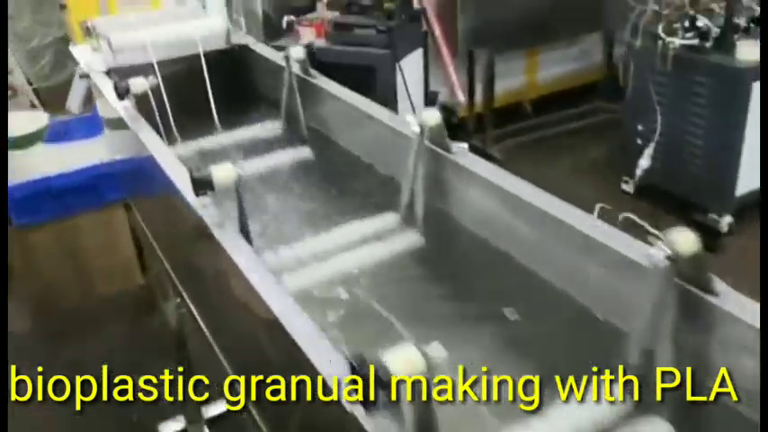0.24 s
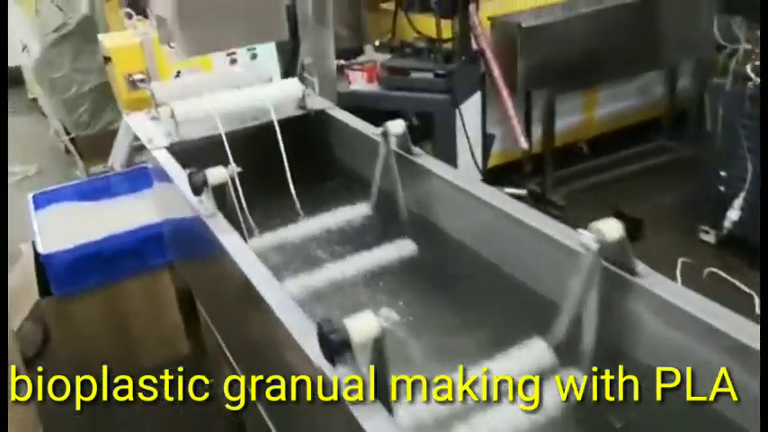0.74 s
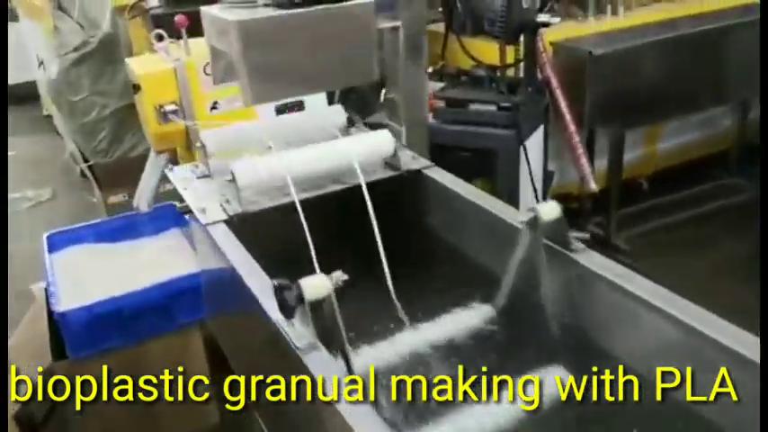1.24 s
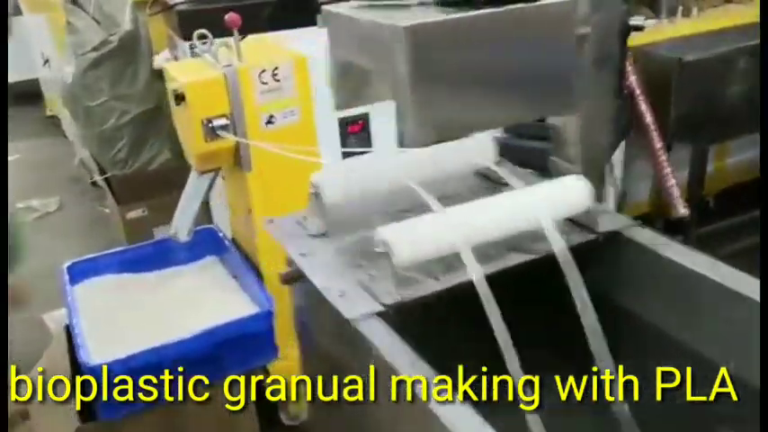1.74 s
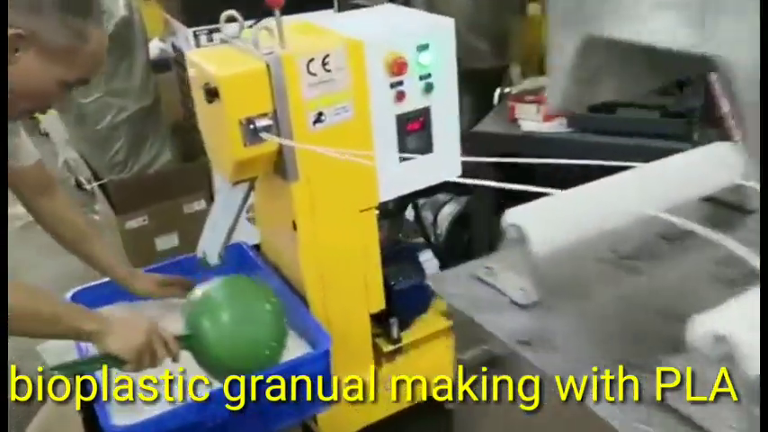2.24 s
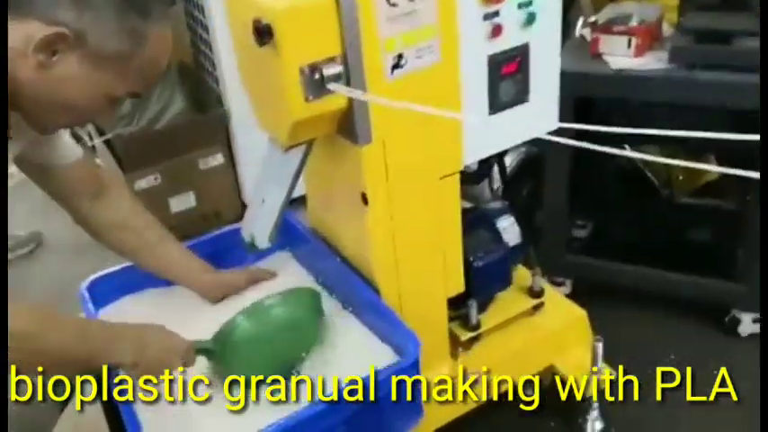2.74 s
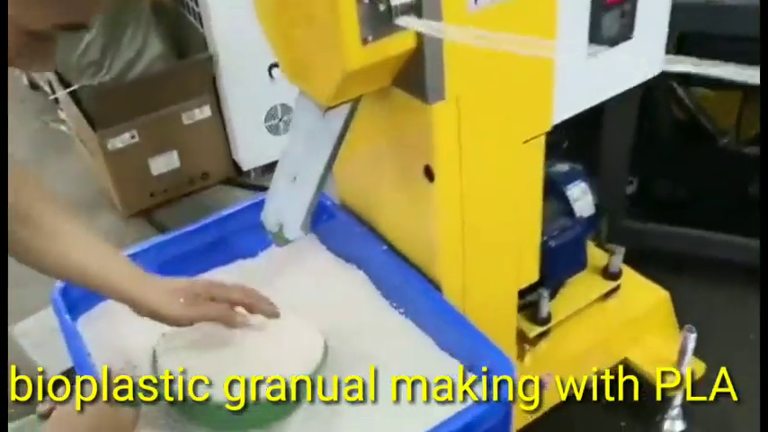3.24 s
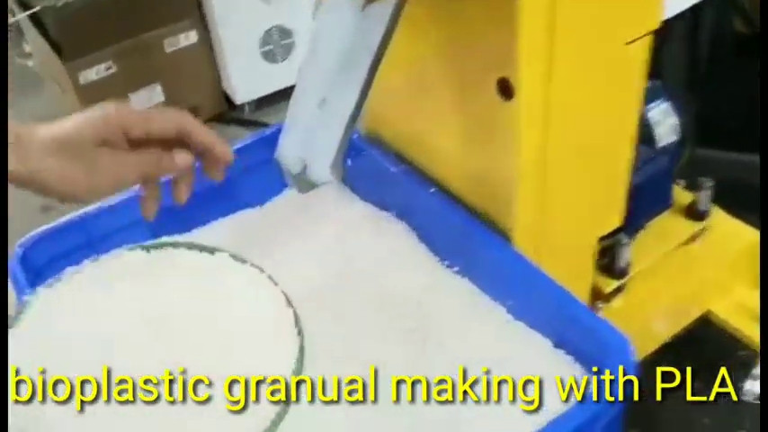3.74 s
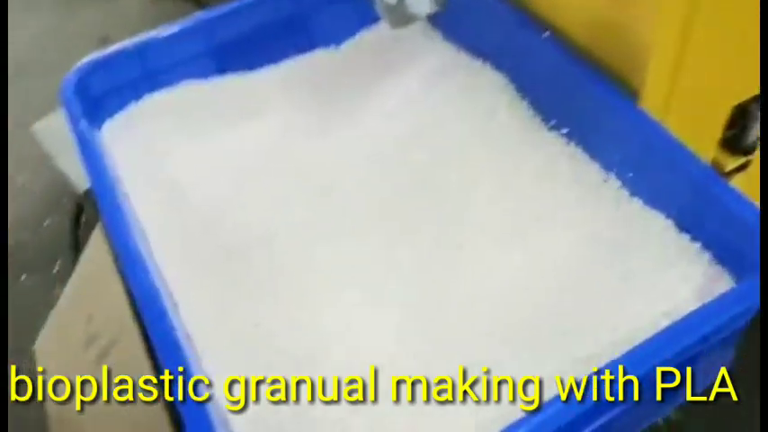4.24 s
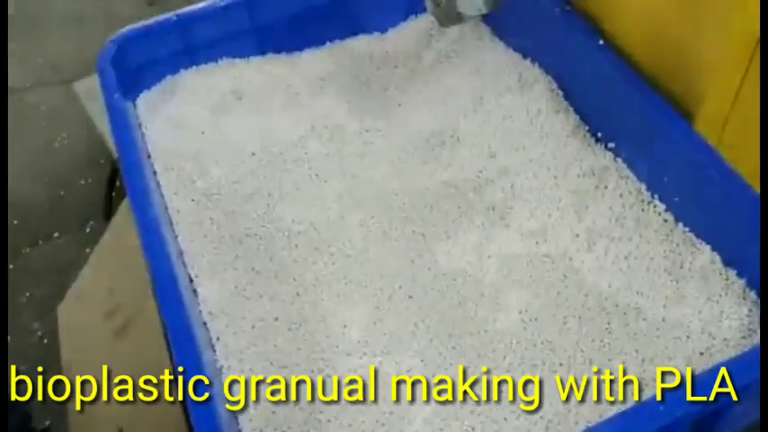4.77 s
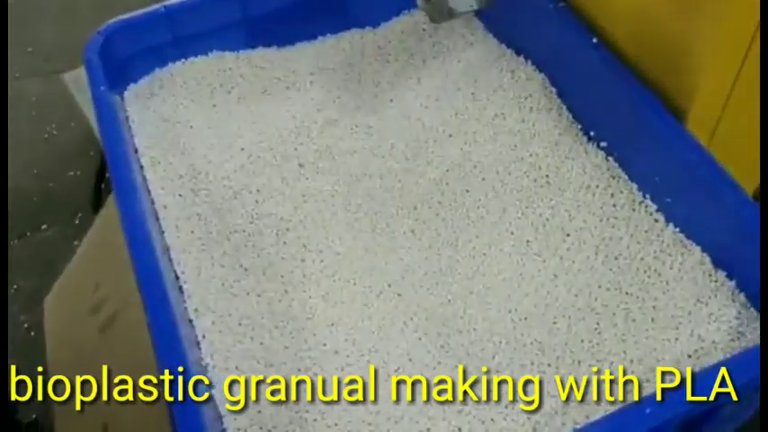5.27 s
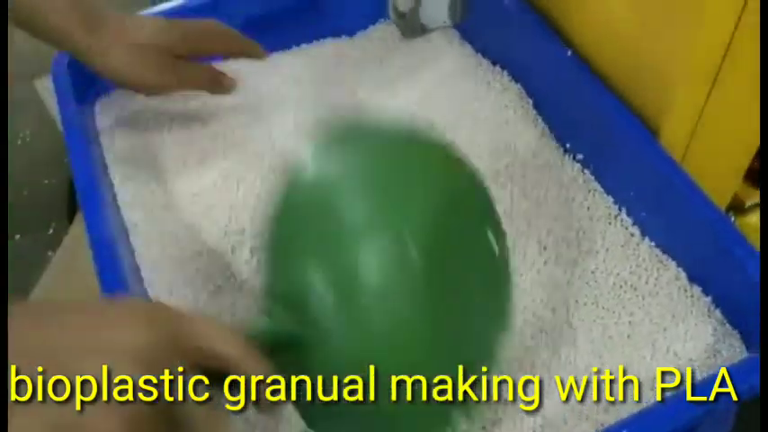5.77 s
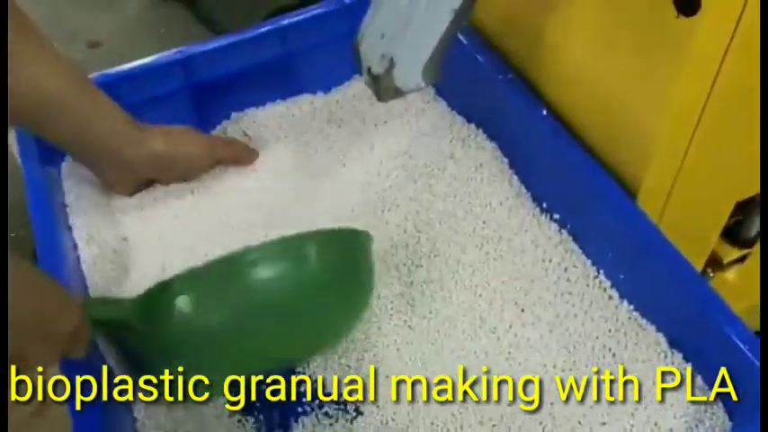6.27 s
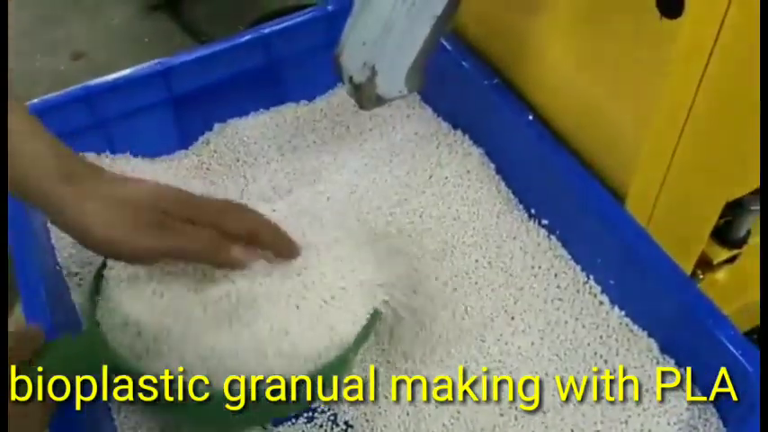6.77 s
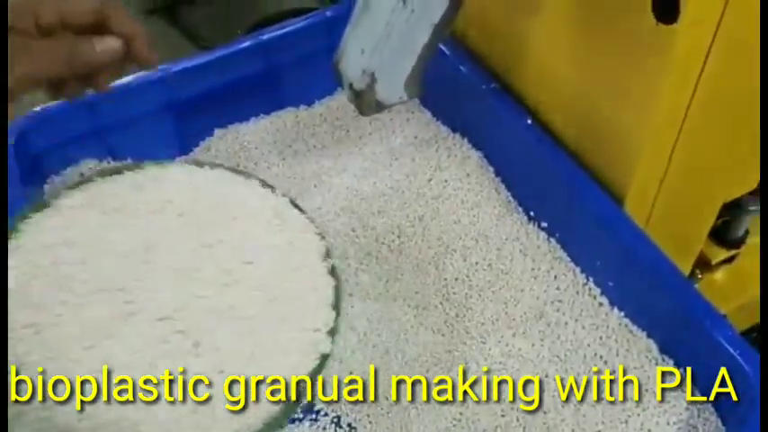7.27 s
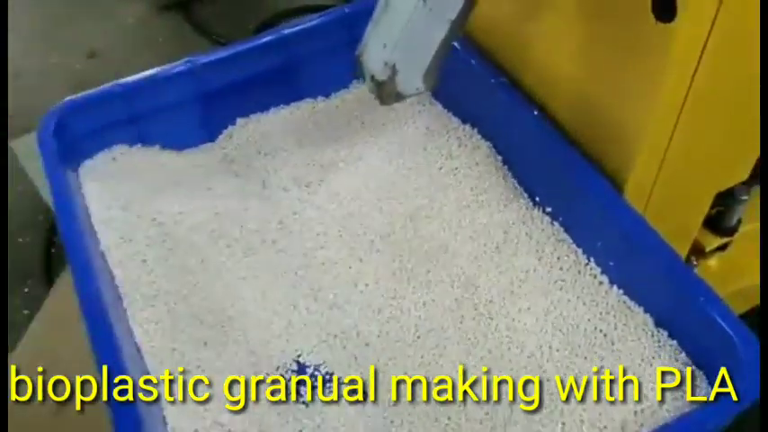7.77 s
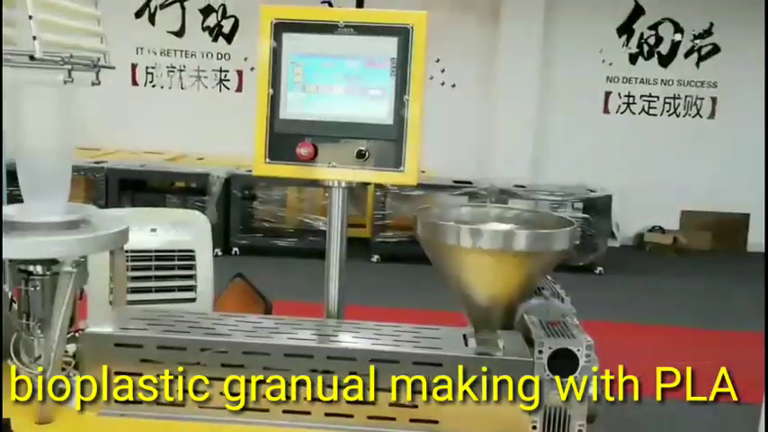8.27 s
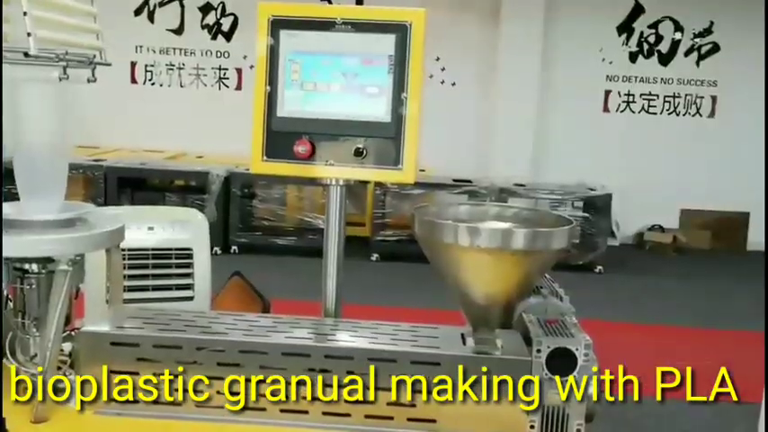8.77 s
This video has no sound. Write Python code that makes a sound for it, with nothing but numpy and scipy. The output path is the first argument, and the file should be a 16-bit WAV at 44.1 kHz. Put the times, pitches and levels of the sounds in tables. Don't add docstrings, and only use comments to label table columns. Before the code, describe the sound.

In a hard factory hall, a handheld phone approaches a strand pelletizer. Broad fan and pump roar carries a rough, metallic whine near one kilohertz that swells and shifts sides. Pellet rattle grows closer, with tiny squeaks, dull knocks and a sharp scoop rap. At about eight seconds it cuts to silence, then a quieter extruder rumbles with a thin high whistle.

```python
import sys
import numpy as np
from scipy import signal
from scipy.io import wavfile
from scipy.ndimage import uniform_filter1d, map_coordinates

SR = 44100
rng = np.random.default_rng(int(sys.argv[2]) if len(sys.argv) > 2 else 0)


def to_wav(sig):
    pcm = np.clip(np.atleast_2d(sig), -1, 1) * 32767
    pcm = np.round(pcm).astype(np.int16)
    wavfile.write(sys.argv[1], SR, pcm.T)


def natural_amplitude(level_db):
    exponent = np.asarray(level_db, float) / 20
    return 10 ** exponent


N = 397341
TIME = np.arange(N) / SR
HOP = 512
FREQ = np.arange(2 * HOP + 1) * SR / (4 * HOP)
FRAME_S = np.arange(-(-N // HOP) + 1) * HOP / SR
ROTOR_HZ, KNIVES = 14.977, 14
CUT_S, RESUME_S = 8.0905, 8.4285

# (time [s], distance to the cutter [m], distance to the chute mouth [m])
WALK = [(0, 6.4, 6.5), (1.0, 1.55, 4.9), (2.0, 2.3, 3.1), (2.5, 1.46, 1.6), (3.0, 1.1, 1.93),
        (3.65, 1.09, 1.46), (4.5, 1.17, 1.24), (5.3, 1.11, 1.08), (6.7, 1.06, 0.93), (8.1, 1.01, 1.17)]
# (time [s], main tone turned to the left port [dB])
TURN = [(0, 6.5), (.55, 3), (.9, 9.5), (1.5, -11), (1.8, 0), (2.1, 9.5), (2.8, 4.5), (3.7, 7.5),
        (4.55, -12.5), (5.3, -1), (7.0, 0.5), (7.7, -5), (8.1, -2.5)]


def columns(table, t):
    s, *values = np.transpose(table)
    return np.array([np.interp(t, s, v) for v in values])


def over_hz(hz, points_hz, values):
    place = np.interp(np.log(np.maximum(hz, 1)), np.log(points_hz), np.arange(len(points_hz)))
    low = np.minimum(place.astype(int), len(points_hz) - 2)
    share = (place - low).reshape((-1,) + (1,) * (np.ndim(values) - 1))
    return np.asarray(values)[low] * (1 - share) + np.asarray(values)[low + 1] * share


def drift(rate, count=1):
    knots = rng.standard_normal((count, 400))
    place = np.minimum(FRAME_S * rate, 399)
    return np.array([map_coordinates(k, [place], order=3) for k in knots])


def patches(rate, band_hz):
    place = np.meshgrid(np.minimum(FREQ / band_hz, 399), FRAME_S * rate, indexing="ij")
    return map_coordinates(rng.standard_normal((400, 400)), place, order=1)


def bump(t, s, half_s):
    return np.exp(-((t - s) / half_s) ** 4)


def rise(s, edge_s):
    return (1 + np.tanh((FRAME_S - s) / edge_s)) / 2


def spectra_of(x):
    return signal.stft(x, nperseg=4 * HOP, noverlap=3 * HOP)[2]


def sound_of(spectra):
    return signal.istft(spectra, nperseg=4 * HOP, noverlap=3 * HOP)[1][:, :N]


def port_table(hz):
    # (frequency [Hz], likeness [0-1], lead of the right port [rad], left minus right [dB])
    port_rows = [(0, 1, 0, 0), (100, .995, .02, 0), (190, .97, .1, 0), (400, .55, .9, -1),
                 (580, .65, 3.1, -3), (800, .45, 6, -3), (1100, .75, 6.2, -6), (1500, .5, 6.3, -3),
                 (2200, .3, 8.8, -4), (3300, .25, 11.9, -3), (4500, .2, 16.6, -8), (5700, .3, 20.5, -10),
                 (8000, .3, 29.6, -7)]
    return columns(port_rows, hz)


def ports(db, grain, turn_db=0):
    like, lead, pan_db = port_table(FREQ)[:, :, None]
    like = np.clip(like, 0, 1)
    near, other = spectra_of(rng.standard_normal((2, N)) * grain)
    half_db = (pan_db + turn_db) / 2 + (1 - like) * 3.6 * patches(10, 89.8)
    left = near * natural_amplitude(db + half_db)
    mixed = like * np.exp(1j * lead) * near + np.sqrt(1 - like ** 2) * other
    right = mixed * natural_amplitude(db - half_db)
    return sound_of(np.array([left, right]) * np.sqrt(SR / 2))


def nearness(metres, hall_db):
    near_m = 1
    hall = np.minimum(natural_amplitude(2 * hall_db), 1)
    return 10 * np.log10(hall + (1 - hall) * (near_m / metres) ** 2)


def whine_map(hz):
    whine_hz = [684, 826, 1006, 1270, 2000]
    hall_whine_db = [-4.5, -11, -16, -7.5, -8]
    # (time [s], half length [s], level [dB])
    crests_3rd = [(.3, .35, 5), (1.2, .35, 4), (2.4, .55, 12), (3.3, .15, -4), (4.3, .85, 5.5),
                  (5.65, .12, -9), (6.55, .25, -8), (7.12, .13, 5)]
    crests_4th = [(.05, 0.14, -17), (.9, 0.49, 5), (1.7, 0.18, -4), (2.1, 0.25, 5.5), (2.8, 0.41, -10),
                  (3.2, 0.07, 5)]
    crests_5th = [(.08, .1, -6), (.4, .15, 3), (.9, .22, -8), (1.27, .07, 3), (1.5, .1, -4), (1.95, .1, -4),
                  (3.4, .07, -3.5)]
    crests_6th = [(.2, 0.23, 4), (.8, .28, 6), (1.13, .05, -11), (1.35, 0.13, 7.5), (1.68, .14, -15),
                  (2.12, 0.14, 8.5), (2.45, 0.18, -7), (3.05, .35, 4.5)]
    crests_7th = [(1.4, .3, 3), (3.0, 0.18, 2), (5.1, .25, 4), (5.8, 0.13, 4), (7.0, .3, 4)]
    crests_9th = [(1.85, 0.25, 3), (2.55, .25, 2), (3.42, 0.1, 8.5), (4.2, .4, -5), (5.9, 0.35, 3.5),
                  (7.0, .15, 3), (7.6, 0.18, 5.5)]
    stroke_crests = {3: crests_3rd, 4: crests_4th, 5: crests_5th, 6: crests_6th, 7: crests_7th, 9: crests_9th}
    crest_width = .013
    cutter_m, chute_m = columns(WALK, FRAME_S)
    levels = [nearness(chute_m if k == 1 else cutter_m, db) for k, db in enumerate(hall_whine_db)]
    levels[2] = levels[2] - 7.5 * (1 - rise(2.36, .05))
    db = over_hz(hz, whine_hz, levels)
    for stroke, rows in stroke_crests.items():
        around = np.exp(-((hz / (stroke * KNIVES * ROTOR_HZ) - 1) / crest_width) ** 2)
        swell_db = sum(crest_db * bump(FRAME_S, s, half_s) for s, half_s, crest_db in rows)
        db = db + np.outer(around, swell_db)
    return db, columns(TURN, FRAME_S)[0]


def roar_levels():
    cutter_m, chute_m = columns(WALK, FRAME_S)
    rumble = 2 * (1 - rise(3.9, .1))
    clatter = nearness(cutter_m, -4.5)
    hiss = nearness(chute_m, -6.5) - 1.5
    rattle = 1.45 * nearness(chute_m, -15)
    turn_db = .5 + 0.13 * columns(TURN, FRAME_S)[0]
    return rumble, clatter, hiss, rattle, turn_db


def extruder():
    # (frequency [Hz], level [dB per Hz])
    extruder_colour = [(25, -58.5), (70, -73), (110, -45), (150, -44.5), (190, -58.5), (430, -59),
                       (520, -71), (760, -69.5), (1150, -68.5), (1600, -73.5), (2300, -65.5), (3000, -73),
                       (3600, -84.5), (7600, -88), (8000, -75.5), (8280, -83), (8400, -94)]
    # (frequency [Hz], level [dB])
    drive = [(7720, -63), (7790, -52.5), (7833, -55.5), (7860, -50), (7973, -44), (8000, -54.5),
             (8027, -44), (8053, -58), (8113, -64), (8140, -50)]
    # (time [s], half length [s], level [dB])
    lulls = [
        (8.475, 0.018, -12),
        (8.629, 0.018, -19.5),
        (8.875, 0.021, -9),
    ]
    bearing = (671.5, -53)  # Hz, dB
    surge_db = 1.5 - 3.5 * (FRAME_S - RESUME_S)
    surge_db = surge_db + sum(db * bump(FRAME_S, s, half_s) for s, half_s, db in lulls)
    surge = np.minimum(surge_db, 9) * ((FREQ > 90) & (FREQ < 190))[:, None]
    room_db = 2.4 * patches(8.2, 150.) * (FREQ > 200)[:, None]
    out = ports(over_hz(FREQ, *np.transpose(extruder_colour))[:, None] + surge + room_db, 0.94)
    start = 8 * SR
    time = TIME[start:]
    for hz, db in [*drive, bearing]:
        lead = 0.91 + 0.63 * np.interp(time, FRAME_S, drift(7.0)[0])
        angle = 2 * np.pi * (hz * time + rng.random()) + np.outer([0, 1], lead)
        out[:, start:] += natural_amplitude(db + np.array([[0.5], [6.5]])) * np.sin(angle)
    return out


def knocks():
    # (time [s], frequency [Hz], level [dB], ring to -60 dB [s])
    thumps = [
        (3.03, 100, -21, .1),
        (3.6, 86, -22, .1),
        (4.13, 70, -22, .1),
        (4.24, 38, -21, .3),
        (4.3, 33, -21, .3),
        (5.6, 62, -19, .2),
        (5.815, 230, -13, 0.06),
        (5.845, 175, -11, .07),
    ]
    out = np.zeros(N)
    for s, hz, db, ring in thumps:
        age = np.maximum(TIME - s, 0)
        decay = np.exp(-np.log(1000) * age / ring)
        onset = np.minimum(age * hz * 2, 1)
        out += natural_amplitude(db) * np.sin(2 * np.pi * hz * age) * decay * onset
    return out


def squeaks():
    # (time [s], length [s], level [dB])
    high_squeaks = [(3.38, .03, -45), (3.53, .04, -41.5), (4.02, .04, -46), (4.128, 0.045, -36.5),
                    (4.238, 0.027, -43.5), (4.376, 0.079, -39), (4.89, .035, -42), (5.505, 0.033, -43),
                    (6.233, 0.026, -25), (6.371, 0.09, -33.5), (6.757, .03, -43), (6.958, .06, -47),
                    (7.454, 0.13, -45.5), (8.003, .05, -43)]
    low_squeaks = [(3.34, 0.027, -41), (3.53, .03, -45), (3.8, .07, -43), (4.0, 0.054, -42),
                   (4.32, .04, -53), (4.55, 0.045, -44), (5.0, .04, -42), (6.42, .07, -41.5),
                   (6.76, .04, -48), (7.33, 0.11, -43)]
    out = np.zeros((2, N))
    for hz, bursts, pan_db in ((7393, high_squeaks, -3), (6156, low_squeaks, -6)):
        size = natural_amplitude(-52) * rise(3.25, .1)
        size = size + sum(natural_amplitude(db) * np.exp(-((FRAME_S - s) / length) ** 2) for s, length, db in bursts)
        waver, flicker = drift(35, count=2)
        angle = 2 * np.pi * np.cumsum(hz + 6 * np.interp(TIME, FRAME_S, waver)) / SR
        size = np.interp(TIME, FRAME_S, size * natural_amplitude(4.5 * flicker))
        balance = natural_amplitude(np.array([[pan_db], [-pan_db]]) / 2)
        out += 1.6 * size * balance * np.sin(angle + np.array([[0], [1.2]]))
    return out


def rotor_turns():
    waver = 0.001193 * drift(3)[0] + 0.001517 * drift(14)[0]
    return np.cumsum(ROTOR_HZ * (1 + np.interp(TIME, FRAME_S, waver)) / SR)


def roar(turns):
    # (frequency [Hz], level [dB per Hz])
    roar_colour = [(25, -68.5), (90, -52.5), (200, -56), (400, -62.5), (560, -62.5), (930, -65.5),
                   (1550, -60.5), (2500, -55), (3200, -58), (3700, -62.5), (4400, -65), (5250, -64),
                   (6300, -65), (7400, -62)]
    # (frequency [Hz], width [Hz], level over the roar [dB])
    housing = [(644, 108, 9.5), (840, 32, 8.5), (1027, 136, 10), (1238, 48, 12), (1270, 80, 8),
               (1428, 40, 4.5), (1710, 200, 5), (1884, 60, 10.5), (2038, 160, 6), (2290, 40, 6.5),
               (2710, 32, 7), (2934, 140, 3.5), (4055, 150, 7), (4656, 110, 6.5), (5080, 100, 1.5),
               (5620, 160, 9.5), (5870, 270, 9), (6600, 320, 3.5)]
    # (time [s], length [s], centre [Hz], width [Hz], level over the roar [dB])
    slides = [
        (1.42, 0.12, 1800, 1600, 3),
        (2.45, .3, 660, 60, 4),
        (4.93, 0.12, 2500, 2600, 6.5),
        (5.15, .12, 1550, 400, 4),
        (5.82, .04, 1800, 2000, 8),
        (6.0, .04, 3500, 3000, 2),
        (6.17, .04, 4200, 1500, 3),
        (7.15, .15, 1550, 400, 4),
        (7.6, .15, 2100, 400, 3),
    ]
    roar_hz = [400, 2600, 4000, 5250, 5480, 5900, 6150]
    rumble, clatter, hiss, rattle, turn_db = roar_levels()
    db = over_hz(FREQ, *np.transpose(roar_colour))[:, None]
    db = db + over_hz(FREQ, roar_hz, [rumble, clatter, hiss, hiss, rattle, rattle, hiss])
    ring = sum((natural_amplitude(2 * d) - 1) / (1 + (2 * (FREQ - hz) / w) ** 2) ** 1.36 for hz, w, d in housing)[:, None]
    drive_db = 0.76 * (whine_map(FREQ)[0] - clatter) * (FREQ < 2200)[:, None]
    db = db + 10 * np.log10(1 + np.maximum(ring, 0) * natural_amplitude(drive_db) ** 2)
    db = db + 2.4 * patches(3.5, 45.) * (FREQ > 550)[:, None]
    db = db + 1.2 * patches(5, 250.) + 2.58 * patches(16, 119.54) + 0.37 * drift(9)
    for s, length, hz, width, slide_db in slides:
        band = np.exp(-((FREQ - hz) / width) ** 2)
        db = db + slide_db * np.outer(band, np.exp(-((FRAME_S - s) / length) ** 2))
    stroke = 1 + .12 * np.cos(2 * np.pi * KNIVES * turns)
    pellets = natural_amplitude(.7 * rng.exponential(size=N // 64 + 1)).repeat(64)[:N]
    grain = stroke * uniform_filter1d(pellets, size=64)
    grain = grain / np.sqrt(np.mean(grain ** 2))
    chute_band = np.exp(-((FREQ - 5400) / 700) ** 2)
    chute_db = -3.5 * np.outer(chute_band, np.minimum(2 * natural_amplitude(rattle), 1))
    return ports(db - 1.5, grain, np.outer(np.clip(FREQ / 2000 - .2, 0, 1), turn_db) + chute_db)


def knives(turns):
    orders = [39.3, 42, 43, 44, 45, 46, 48, 49, 50, 55, 56, 57, 69, 70, 71, 75, 76, 77, 78, 83, 84, 85, 98,
              112, 126, 140, 147, 154, 168, 182, 196, 210, 224]
    left_db = [-54.5, -44.5, -41.5, -34.5, -46, -47, -47, -51, -56, -55.5, -30.5, -51.5, -36, -27.5, -44,
               -39, -33, -39, -31, -43.5, -31, -44, -41, -40, -40.5, -38, -50.5, -36.5, -45, -44, -46.5,
               -43.5, -53.5]
    right_db = [-51, -34, -35.5, -38, -43.5, -38.5, -35, -40.5, -47.5, -45, -37.5, -46, -36, -21, -30.5,
                -33, -29, -28.5, -30.5, -45, -33.5, -37.5, -38, -37, -28, -29.5, -45, -34, -34, -35, -53,
                -48, -49]
    hz = ROTOR_HZ * np.array(orders)
    heard_db, turn_db = whine_map(hz)
    uneven = np.array(orders) % KNIVES > 0
    heard_db = heard_db - 5 * np.outer(uneven, 1 - rise(2.75, .15))
    lead = port_table(hz)[1]
    time, turns = TIME[::4], turns[::4]
    out = np.zeros((2, len(time)))
    for k, order in enumerate(orders):
        angle = 2 * np.pi * (order * turns + rng.random())
        both_db = heard_db[k] + hz[k] / 800 * drift(14)[0]
        wander = (.5 if order in (3 * KNIVES, 5 * KNIVES) else 1.3) * drift(1.209)[0]
        own_db = 2.2 * drift(2.556, count=2) * (1 if order % KNIVES else .5)
        if abs(order - 5 * KNIVES) <= 1:
            own_db = 0.15 * own_db + np.outer([.8, -.2], turn_db)
        left = np.interp(time, FRAME_S, natural_amplitude(left_db[k] + both_db + own_db[0]))
        right = np.interp(time, FRAME_S, natural_amplitude(right_db[k] + both_db + own_db[1]))
        out[0] += left * np.sin(angle)
        out[1] += right * np.sin(angle + lead[k] + np.interp(time, FRAME_S, wander))
    return np.sqrt(2) * signal.resample_poly(out, 4, 1, axis=1)[:, :N]


def band_gate(x, top_hz=7530):
    spectra = spectra_of(np.array([x[0] + x[1], x[0] - x[1]]) / 2)
    power = np.abs(spectra) ** 2
    band = uniform_filter1d(uniform_filter1d(power, size=5, axis=1), size=2, axis=2)
    log_power = np.log(power + 1e-18)
    masker = np.exp(uniform_filter1d(uniform_filter1d(log_power, size=35, axis=1), size=9, axis=2))
    keep = np.clip((band / (masker * natural_amplitude(2 * -2.2))) ** 3.5, .04, 1)
    dropout = np.clip(5 * (patches(28, 120.) - .95), 0, 1) * (FREQ > 1400)[:, None]
    keep = keep * (1 - .93 * dropout)
    keep[:, FREQ < 490] = 1
    low_pass = np.clip((top_hz - FREQ) / 60, 0, 1)[:, None]
    mid, side = sound_of(spectra * keep * low_pass)
    return np.array([mid + side, mid - side])


def scene():
    turns = rotor_turns()
    hall = band_gate(knives(turns) + roar(turns) + squeaks() + knocks())
    low_pass = signal.ellip(8, .3, 60, 8900, fs=SR, output="sos")
    room = signal.sosfilt(low_pass, extruder())
    fade_out = np.clip((CUT_S - TIME) / .0002, 0, 1)
    fade_in = np.clip((TIME - RESUME_S) / 0.0013, 0, 1)
    return hall * fade_out + room * fade_in


def top_cut(x):
    return signal.sosfilt(signal.butter(12, 8430, fs=SR, output="sos"), x)


def record(dry):
    loudness = uniform_filter1d(np.abs(dry), size=96, axis=1)
    squeeze = 0.14 * np.minimum(np.abs(loudness) / 0.39, 1) ** 2
    return top_cut(dry * (1 - squeeze))


dry = scene()
out = record(dry)
to_wav(out)
```